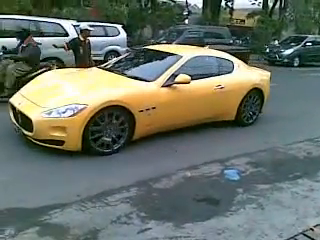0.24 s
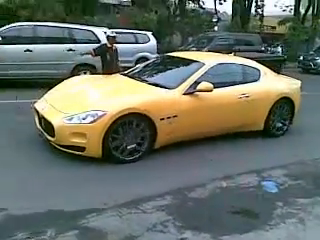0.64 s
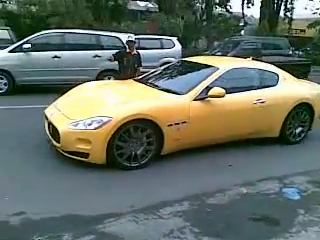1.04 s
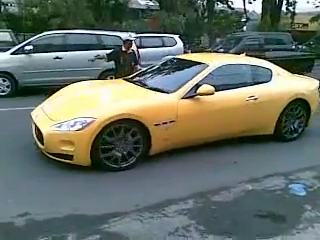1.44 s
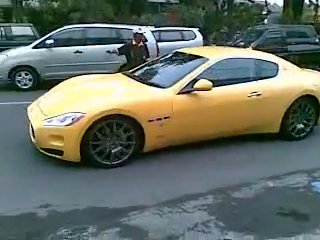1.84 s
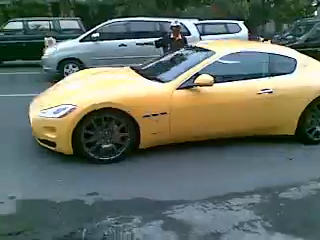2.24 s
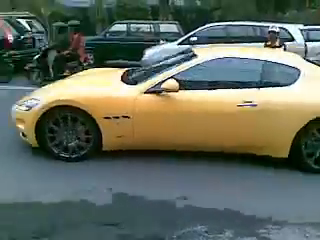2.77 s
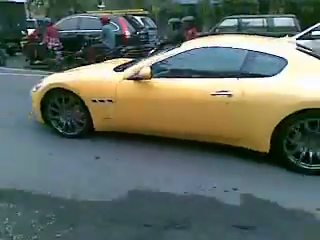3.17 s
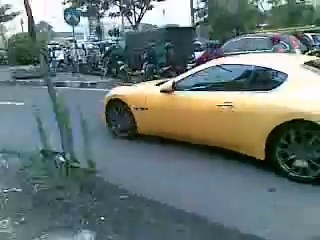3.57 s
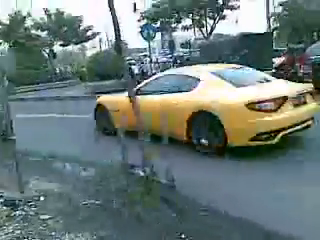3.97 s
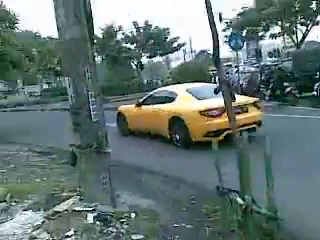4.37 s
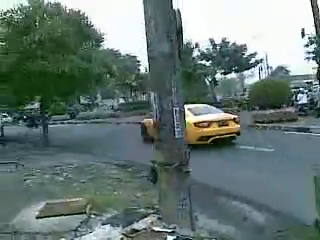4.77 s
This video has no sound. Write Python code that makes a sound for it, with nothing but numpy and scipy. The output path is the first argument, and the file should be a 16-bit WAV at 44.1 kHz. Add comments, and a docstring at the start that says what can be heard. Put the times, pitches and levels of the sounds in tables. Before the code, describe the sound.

A V8 sports car idles close to a roadside microphone with a deep, uneven burble. Distant city traffic washes softly throughout, with a few faint far-off toots and drones in the first second and a half and an occasional tick of grit. At about 1.4 seconds a two-tone car horn gives one very short beep, echoing lightly off the houses. Around 2 seconds the engine starts to rev up, with a quick run of exhaust pops near 2.5 seconds and a faint crunch of grit under the tyres. The exhaust booms and barks as the car passes at about 3 seconds, and the revs hold nearly level until 3.8 seconds. From 4 seconds the car accelerates away hard, the pitch climbing steadily as the exhaust cracks, rasps and hisses, still rising at about 5 seconds.

```python
"""A V8 sports car idles in a city street, then pulls past the microphone and accelerates away.
Its uneven firing pulses burble in the silencer, then bark, rasp and hiss as the tailpipes turn towards us.
While it idles, a two-tone horn gives one short beep and the house fronts answer.
A little grit ticks on the road; traffic washes in the distance. One microphone, at the roadside."""
import sys
import numpy as np
from scipy import signal
from scipy.fft import rfft, irfft, next_fast_len
from scipy.io import wavfile
from scipy.ndimage import uniform_filter1d

SR = 44100
rng = np.random.default_rng(int(sys.argv[2]) if len(sys.argv) > 2 else 0)


def generate_wav(sig):
    """Save sig (samples, or channels by samples) to the path in sys.argv[1] as 16-bit PCM at SR."""
    pcm = np.round(np.clip(np.atleast_2d(sig).T, -1, 1) * 32767).astype(np.int16)
    wavfile.write(sys.argv[1], SR, pcm)


N = 221861
T = np.arange(N) / SR


# engine speed as the car pulls away: (time [s], firing rate [Hz])
REVS = [(1.9, 59.2), (2.0, 67), (2.09, 77), (2.14, 78.5), (2.2, 94.84), (2.29, 102.8), (2.43, 113.0),
        (2.6, 124.42), (2.84, 164.6), (2.92, 169.75), (3.0, 173.41), (3.08, 181.24), (3.16, 186.29),
        (3.25, 195.61), (3.58, 195.21), (3.71, 198.61), (3.8, 196.76), (3.98, 207.81), (4.12, 222.31),
        (4.2, 232.37), (4.28, 246.67), (4.4, 256.55), (4.52, 272.99), (4.6, 288.53), (4.76, 314.26),
        (4.95, 345.69), (5.03, 358.72)]
def engine(idle_hz=57.08, idle_until_s=1.82, hunt_hz=0.588, lead_fires_s=4.1934, echo_db=-14):
    """The V8 going past: its speed times every pulse and sets the load; the sharper sounds echo."""
    rate_hz, = follow([(idle_until_s, idle_hz), *REVS])
    load = ramp(rate_hz, 66, 15)
    rate_hz = rate_hz + hunt_hz * (1 - load) * drift(3.08)
    turns = np.cumsum(rate_hz) / SR  # one turn per firing
    turns += (1 - np.interp(lead_fires_s, T, turns)) % len(CYLINDERS)  # the second cylinder is due then
    behind, = follow([(4.05, 0.19), (4.2, 0.67), (4.7, 0.91)])  # how far the pipes face the microphone
    pipes = tailpipes(turns, rate_hz, behind) + cracks(turns) + rattle(turns) + pops()
    notes = boom(turns, rate_hz) + load * silencer(turns, rate_hz) + snarl(turns, rate_hz)
    direct = notes + burble(turns, rate_hz, behind) + pipes
    return amp(echo_db) * street(pipes, t60=0.046) - direct


# the eight cylinders in firing order; each layer scales the strengths to its own depth:
# (silencer strength [dB], lateness [firing intervals], side strength [dB], rear strength [dB])
CYLINDERS = [(3.5, -0.0038, 3, -1), (3.5, 0.013, 5, 4), (3, 0.037, 1, 1), (-6, -0.031, -5, -2.5),
             (1.5, -0.031, 1.5, -1), (1.2, 0.0026, -3, 0), (1, 0.032, 0.5, 3.5), (-0.5, -0.012, -0.5, -0.5)]
LUMP_DB, LATE, SIDE_DB, REAR_DB = np.transpose(CYLINDERS)
def firings(turns, cylinders_db, scatter_db, jitter, depth=1):
    """One click per firing; each cylinder has its own strength and lateness, and no two burns match."""
    number = np.arange(int(turns[0]) + 1, int(turns[-1]))
    cylinder = number % len(CYLINDERS)
    burn, slip = rng.standard_normal((2000, 2))[number].T
    at = np.clip(np.interp(number + LATE[cylinder] + jitter * slip, turns, np.arange(N)), 0, N - 2)
    whole = at.astype(int)
    size = amp(np.broadcast_to(depth, N)[whole] * cylinders_db[cylinder] + scatter_db * burn)
    return np.bincount(whole, size * (1 - at + whole), N) + np.bincount(whole + 1, size * (at - whole), N)


def uneven_part(clicks, turns, share=1):
    """Takes a share of the even pulse train away, leaving the lope of the cylinders."""
    even = firings(turns, np.zeros(len(CYLINDERS)), scatter_db=1, jitter=0)
    return clicks - share * even * clicks.sum() / even.sum()


def puffs(clicks, decay_s):
    """A burst of turbulent gas after each click."""
    envelope = signal.lfilter([1], [1, -np.exp(-1 / (decay_s * SR))], clicks)
    return steady(envelope * rng.standard_normal(N))


# standing waves of the exhaust: (centre [Hz], width [Hz], gain [dB])
RESONANCES = [(55.5, 22, -26), (108.5, 14.4, -23), (180.4, 10, -29), (209.8, 39, -25), (247, 83, -25.5),
              (331.7, 30, -29), (570, 210, -38.5)]
# swell of the firing note at the microphone: (time [s], gain [dB])
BOOM_DB = [(2.4, -1), (2.75, 0.5), (3.0, 3.5), (3.16, 3), (3.22, -7.5), (3.33, -2), (3.45, 0), (3.7, -1),
           (3.9, 0.5), (4.2, 0.5), (4.35, -1.5), (4.9, 2.5)]
# the note an octave above it, as the exhaust passes it: (frequency [Hz], level [dB])
OCTAVE = [(114, -49), (150, -53), (175, -33.5), (195, -52), (215, -38.5), (236, -32), (262, -32),
          (285, -32.5), (315, -31), (335, -27), (365, -37.5), (385, -40), (405, -38), (440, -43),
          (500, -36), (605, -39), (645, -51), (690, -34)]
def boom(turns, rate_hz, full_flow_hz=164, flow_db_per_octave=10.5, waver_db=1.5):
    """The low notes of the mean gas flow swell and fade as they climb through the standing waves."""
    flow = amp(flow_db_per_octave * np.minimum(np.log2(rate_hz / full_flow_hz), 0))
    resonance = np.sqrt(sum((amp(db) / (1 + (2 * (rate_hz - centre) / width) ** 2)) ** 2
                            for centre, width, db in RESONANCES))
    swell_db, = follow(BOOM_DB)
    first = flow * resonance * amp(swell_db + waver_db * drift(6.3))
    second = amp(lookup(2 * rate_hz, OCTAVE) + waver_db * drift(9.9))
    return np.sqrt(2) * (first * np.cos(2 * np.pi * turns) + second * np.cos(4 * np.pi * turns))


# the silencer at idle, pulling, and heard from behind: (frequency [Hz], relative gain [dB])
IDLE = [(15, -68.5), (24, 19.5), (45, -7), (72, 14), (100, 3), (165, 2.5), (240, -16.5), (380, -30),
        (600, -62.5)]
PIPE = [(20, -10.5), (70, -1.5), (140, -10.5), (220, 7), (270, 6), (330, 8), (385, -1.5), (450, -31),
        (650, -71.5)]
PIPE_BEHIND = [(20, -26), (70, 2.5), (140, 8), (220, -19), (300, 9), (400, 11), (450, 6), (620, -66.5)]
def burble(turns, rate_hz, behind, idle_db=-42, load_db=-33.5, behind_db=-9):
    """Strong and weak firings depart from the mean flow and ring the silencer, deeper at idle."""
    pull = ramp(rate_hz, 70, 51.2)
    idling = uneven_part(firings(turns, LUMP_DB, scatter_db=5.5, jitter=.054), turns)
    pulling = uneven_part(firings(turns, .7 * LUMP_DB, scatter_db=1.1, jitter=.01), turns)
    leaving = uneven_part(firings(turns, .8 * LUMP_DB, scatter_db=.9, jitter=.005), turns)
    loaded = blend(colour(pulling, PIPE), colour(leaving, PIPE_BEHIND), behind)
    level_db = idle_db + (load_db - idle_db) * pull + behind_db * behind
    return amp(level_db) * blend(colour(idling, IDLE), loaded, np.sqrt(pull))


def silencer(turns, rate_hz, centre_hz=292, width_hz=48, ring_db=-37):
    """At low revs the third and fourth harmonics sing as they sweep through the silencer's resonance."""
    ring = sum(np.exp(-((k * rate_hz - centre_hz) / width_hz) ** 2) * np.cos(2 * np.pi * k * turns)
               for k in (3, 4))
    return np.sqrt(2) * amp(ring_db) * ring


# the driver's foot: (time [s], effort [dB])
PEDAL = [(2.2, -21.5), (2.52, -5.5), (2.78, -6), (2.87, 1), (3.0, -1.5), (3.6, 3), (3.72, -1), (4.05, 3.5),
         (4.6, 5), (4.7, 8.5)]
# how unequal the cylinders sound, most while the revs are held: (time [s], depth [ratio])
LOPE = [(2.4, .8), (2.8, .35), (3.0, .5), (3.25, 1.3), (3.65, 1.35), (3.8, .85), (4.05, 1)]
def tailpipes(turns, rate_hz, behind, db_per_octave=4.5):
    """The open pipes bark, rasp, hiss and ring under load; the blast grows with revs and pedal."""
    throttle, = follow([(2.05, 0.12), (2.25, 0.93)])
    pedal_db, = follow(PEDAL)
    unequal, = follow(LOPE)
    blast_db = -31 + db_per_octave * np.log2(rate_hz / 204.6) + pedal_db
    turns = turns + .022 * (1 - .55 * behind) * drift(24)  # eddies in the hot gas vary the travel time
    gentle = firings(turns, .7 * SIDE_DB, scatter_db=1.6, jitter=.01, depth=unequal)
    fronts = firings(turns, 1.1 * SIDE_DB, scatter_db=1.4, jitter=.012, depth=unequal)
    hard = firings(turns, REAR_DB, scatter_db=1.0, jitter=.01)
    lope = steady(uneven_part(hard, turns, share=.5))  # from behind, the banks' even beat partly cancels
    blast = amp(blast_db) * (bark(gentle, hard, lope, behind) + rasp(fronts, hard, lope, behind))
    gas = amp(.69 * blast_db) * hiss(turns, rate_hz, fronts, behind)
    return throttle * (blast + gas + pipe_mouth(turns, unequal))


# the bark from in front, abreast and behind: (frequency [Hz], relative gain [dB])
BARK_AHEAD = [(250, -54), (390, -22), (480, 7.5), (600, 11.5), (690, 9.5), (800, -10.5), (900, 4),
              (1020, 0), (1300, -52.5)]
BARK_SIDE = [(250, -60), (390, -26), (470, 8), (580, 3.5), (690, 3.5), (780, 11.5), (900, -1), (1020, 4.5),
             (1300, -65.5)]
BARK_BEHIND = [(250, -61.5), (390, 13.5), (470, 11), (600, 10.5), (700, -0.5), (820, 15.5), (950, -5.5),
               (1080, 1), (1350, -54.5)]
def bark(gentle, hard, lope, behind, abreast_s=3.09, gain_db=1, behind_db=-16):
    """Pulses ring the pipes' middle range, changing colour as the car draws level and leaves."""
    chuffs = steady(gentle) + .2 * puffs(gentle, .003)
    side = blend(colour(chuffs, BARK_AHEAD), colour(chuffs, BARK_SIDE), ramp(T, abreast_s, 0.079))
    rear = colour(lope + .15 * puffs(hard, .003), BARK_BEHIND)
    return amp(gain_db + behind_db * behind) * steady(reflected(blend(side, rear, behind)))


# the rasp from the side and from behind: (frequency [Hz], relative gain [dB])
RASP_SIDE = [(600, -17.5), (900, 1), (1100, 25), (1350, 20.5), (1520, 20.5), (1700, 12.5), (1950, 17),
             (2200, -40.5), (2600, -48), (4000, -69.5)]
RASP_BEHIND = [(600, -8.5), (900, 10), (1100, 1), (1280, 3), (1450, -2), (1700, 1), (2080, 7), (2400, -13),
               (2750, -11), (4500, -68.5)]
# its surge at the microphone: (time [s], gain [dB])
RASP_DB = [(2.35, -10), (2.7, -0.5), (2.85, -1.5), (2.95, 2), (3.15, 2), (3.45, -1), (3.7, 0), (3.9, .5),
           (4.05, -1), (4.6, -0.5), (5.0, -4.5)]
def rasp(fronts, hard, lope, behind, aim_s=4.055, aim_width_s=.055, gain_db=-6, behind_db=-4):
    """Pulses steepen into a rasp that peaks as the pipes sweep past the microphone."""
    surge_db, = follow(RASP_DB)
    aim_db = 5.5 * np.exp(-((T - aim_s) / aim_width_s) ** 2)
    side = colour(steady(fronts) + .2 * puffs(fronts, .002), RASP_SIDE)
    rear = colour(lope + .3 * puffs(hard, .002), RASP_BEHIND)
    level_db = gain_db + surge_db + behind_db * behind + aim_db
    return amp(level_db) * steady(reflected(blend(side, rear, behind)))


# the gas jet from the side, from behind and at top revs: (frequency [Hz], relative gain [dB])
HISS_SIDE = [(1500, -30.5), (2600, -2), (3200, -14), (4000, 2.5), (5000, -13), (6200, -8), (7500, -41),
             (9400, -10.5), (10300, -37), (13000, -42.5)]
HISS_BEHIND = [(1500, -11), (2600, -7), (3000, 5.5), (3450, 8), (4100, -2), (5000, -8), (6200, -16),
               (7500, -38), (9400, -32), (10300, -40), (13000, -43.5)]
HISS_TORN = [(1500, -12), (2600, 1), (3000, 2.5), (3400, 11), (4100, 1), (5000, -0.5), (6200, -9.5),
             (7500, -24), (9400, -6.5), (10300, -35), (13000, -23)]
def hiss(turns, rate_hz, fronts, behind, gain_db=-45, behind_db=12, tear_hz=293, tear_db=3.5):
    """Spat gas beams backwards; at top revs the jet tears, with one strong burst per crank turn."""
    spits = firings(turns, 2.2 * REAR_DB, scatter_db=1.5, jitter=.009)
    bursts = firings(turns, np.array([0, 13, 4, 0, 0, 8, 2, 0]), scatter_db=2.5, jitter=.02)
    side = colour(puffs(fronts, .0055) + .11 * rng.standard_normal(N), HISS_SIDE)
    rear = colour(puffs(spits, .0035) + .35 * rng.standard_normal(N), HISS_BEHIND)
    crackle = colour(puffs(bursts, .0018) + .25 * rng.standard_normal(N), HISS_TORN)
    torn = ramp(rate_hz, tear_hz, 7.5)
    level_db = gain_db + behind_db * behind + tear_db * torn
    return amp(level_db) * blend(blend(side, rear, behind), crackle, torn)


# the ring of the tailpipe's mouth: (frequency [Hz], relative gain [dB])
MOUTH = [(450, -51), (640, -12), (740, -2), (790, 6.5), (850, -5.5), (950, -18.5), (1300, -59), (3000, -91)]
# its swell on the way past: (time [s], relative level [dB])
MOUTH_DB = [(2.3, -66), (2.52, -47.5), (2.7, -44.5), (2.85, -52), (3.1, -47), (3.22, -41), (3.35, -35.5),
            (3.48, -47), (3.57, -32.5), (3.65, -36), (3.72, -52), (3.85, -71)]
def pipe_mouth(turns, unequal):
    """The pulses ring the tailpipe's mouth with a flutter, loudest as it passes closest."""
    level_db, = follow(MOUTH_DB)
    knocks = firings(turns + .014 * drift(45), SIDE_DB, scatter_db=2.0, jitter=.02, depth=unequal)
    return amp(level_db) * steady(colour(knocks, MOUTH))


# partials of the two banks, before the pipes shape them:
# (multiple of crank speed [ratio], level turning away [dB], level from straight behind [dB])
SNARL = [(1, -42, -37), (1.5, -52.5, -40), (2.5, -44, -47), (3, -52, -36.5), (3.5, -48.5, -40.5),
         (4.5, -45, -33.5), (5, -39, -31), (5.5, -43, -49), (6, -43, -31.5), (6.5, -46.5, -52),
         (7, -37, -33), (7.5, -49, -57), (8.5, -52, -50), (9, -47.5, -47.5), (9.5, -59, -51),
         (10, -51.5, -37.5), (10.5, -57, -45), (11, -44, -44), (11.5, -50.5, -56), (12, -39.5, -40),
         (12.5, -60.5, -46), (13, -50, -42), (14, -54.5, -47), (17, -47.5, -54), (19, -49.5, -51.5),
         (21, -45, -53), (22, -47.5, -46)]
# peaks and gaps of the tailpipes: (frequency [Hz], gain [dB])
SNARL_PIPE = [(300, -6.5), (400, -6.5), (455, -6.5), (520, -3), (600, 2.5), (645, 7), (690, 6.5),
              (740, 3.5), (775, -1), (810, 2.5), (850, 1.5), (900, -4.5), (950, -9.5), (1020, -0.5),
              (1200, 0)]
def snarl(turns, rate_hz, from_s=3.89, away_s=4.41, waver_db=2.5, dispersion=.9):
    """From behind, the banks beat unevenly: close-set crank partials climb through the pipes' peaks."""
    crank, crank_hz = turns / 4, rate_hz / 4
    away = ramp(T, away_s, 0.26)
    partials = np.zeros(N)
    for k, turning_db, away_db in SNARL:
        db = turning_db + (away_db - turning_db) * away + lookup(k * crank_hz, SNARL_PIPE)
        swell_db, wobble = waver_db * drift(9), .22 * drift(45)
        partials += amp(db + swell_db) * np.cos(2 * np.pi * k * crank + dispersion * k * k + wobble)
    return np.sqrt(2) * ramp(T, from_s, 0.25) * partials


# the crack of the strongest pulses: (frequency [Hz], relative gain [dB])
CRACK = [(600, -24), (1000, 6), (1500, 11.5), (2050, 10), (2700, -12.5), (3500, -15.5), (5000, -14.5),
         (6200, -30), (9500, -43), (13000, -55.5)]
def cracks(turns):
    """The strongest pulses steepen into shocks that crack out once the pipes face the microphone."""
    level_db, = follow([(4.08, -85), (4.16, -35.5), (4.32, -35), (4.42, -44),
                        (4.6, -44), (4.75, -54), (5.03, -60)])
    shocks = firings(turns, 2.2 * REAR_DB, scatter_db=1.0, jitter=.008)
    return amp(level_db) * steady(reflected(colour(shocks, CRACK)))


# pops as the throttle bites: (time [s], relative level [dB])
POPS = [(2.4344, -19.5), (2.4822, -15.5), (2.5157, -14.5), (2.548, -11), (2.581, -17), (2.6113, -16)]
# their colour: (frequency [Hz], relative gain [dB])
POP_COLOUR = [(300, -30), (700, 12), (1100, 0), (1700, 4), (2050, -6), (2400, -25), (4000, -23),
              (9000, -39), (13000, -50)]
def pops():
    """Single hard burns snap out of the pipes."""
    clicks = np.zeros(N)
    for s, db in POPS:
        clicks[round(s * SR)] = amp(db)
    return reflected(colour(clicks, POP_COLOUR))


def rattle(turns, ring_s=0.0016):
    """At held revs a thin piece of metal buzzes once in each engine cycle."""
    level_db, = follow([(3.3, -69), (3.55, -60.5), (3.8, -75)])
    knocks = firings(turns, 4 * SIDE_DB, scatter_db=2.5, jitter=.02)
    held = ramp(T, 2.9, .3) - ramp(T, 3.85, .3)
    metal = [(2500, -35.5), (3500, -4), (4050, 9), (4500, -16), (6000, -36)]
    return held * amp(level_db) * colour(puffs(knocks, ring_s), metal)


# the horn pair: (harmonic [number], low horn level [dB], high horn level [dB])
HORN = [(1, -40, -50), (2, -36.5, -33.5), (3, -37.5, -45), (4, -33.5, -27), (5, -33, -49.5), (6, -46, -62),
        (7, -44, -71), (8, -62, -60), (9, -63, -75), (10, -61, -67), (11, -70, -65), (13, -63, -70),
        (14, -66, -75), (15, -63, -70), (17, -73, -66)]
# how strongly the street rings on after it: (frequency [Hz], gain [dB])
HORN_RING = [(420, -14), (830, -19), (1020, -3.5), (1250, -4), (1670, -17), (2050, -24), (2500, -6),
             (3000, -24), (4200, -33)]
def horn(start_s=1.363, length_s=0.057, rise_s=0.01, release_s=0.017, ring_s=0.063,
         low_hz=416.5, high_hz=511, sag_per_s=0.45, dispersion=0.36):
    """Two buzzing diaphragms a third apart; near partials beat, and the middle ones ring on."""
    t = np.maximum(T - start_s, 0)
    after = np.maximum(t - length_s, 0)
    direct, ring = np.exp(-after / release_s), np.exp(-after / ring_s)
    slack = t - sag_per_s * np.minimum(after, 2 * release_s) ** 2 / 2  # pitch droops as the current stops
    low, high = (hz * slack + .006 * drift(150) for hz in (low_hz, high_hz))
    tone = np.zeros(N)
    for k, low_db, high_db in HORN:
        for cycles, hz, db in ((low, low_hz, low_db), (high, high_hz, high_db)):
            fade = np.maximum(direct, ring * amp(lookup(k * hz, HORN_RING)))
            tone += amp(db) * fade * np.cos(2 * np.pi * k * cycles + dispersion * k ** 2)
    chatter = 1 + 0.11 * drift(320)  # the contact breaker strikes unevenly
    return np.sqrt(2) * np.minimum(t / rise_s, 1) * chatter * tone


# grit on the road: (time [s], relative peak [dB], rise [s], decay [s])
GRIT = [(0.361, -54.5, 0.0014, 0.0054), (1.126, -55, .001, .004), (2.385, -57.5, 0.014, 0.016),
        (2.528, -64.5, 0.023, 0.027), (2.65, -57, 0.022, 0.03), (2.766, -56, 0.028, 0.074),
        (2.913, -56.5, 0.023, 0.27), (4.133, -51.5, .001, 0.013)]
def grit(gain=0.94):
    """Small stones snap and crunch under the tyres."""
    snaps = sum(amp(db) * np.exp(-(np.minimum(T - s, 0) / rise_s) ** 2 - np.maximum(T - s, 0) / decay_s)
                for s, db, rise_s, decay_s in GRIT)
    stone = [(1500, -21.5), (3000, -6), (4200, 3.5), (6000, -7),
             (9500, -6.5), (10500, -22.5), (13000, -27.5)]
    return gain * colour(snaps * rng.standard_normal(N), stone)


def reflected(x, ground_s=0.00122, ground=0.19, far_pipe_s=.0069, far_pipe=0.24):
    """Each pulse reaches the microphone again off the road and from the far side of the car."""
    return x + ground * np.interp(T - ground_s, T, x) + far_pipe * np.interp(T - far_pipe_s, T, x)


def street(x, t60, first_s=0.02, echoes_per_s=2000):
    """Scattered echoes from parked cars and house fronts."""
    t = np.arange(SR) / SR
    taps = rng.choice([-1, 1], SR) * (rng.random(SR) < echoes_per_s / SR)
    taps = taps * (t > first_s) * amp(-60 * t / t60)
    return signal.oaconvolve(x, taps / np.linalg.norm(taps))[:N]


# distant traffic: (frequency [Hz], relative gain [dB])
TRAFFIC = [(30, 1.5), (200, 8.5), (400, -1), (500, -8), (650, -6.5), (850, -6.5), (1300, -8), (1900, -4.5),
           (2300, -12), (2800, -19), (4000, -20), (5500, -24), (7500, -31.5), (9300, -30), (10500, -38.5),
           (13000, -56)]
# its level at the roadside: (time [s], level [dB])
TRAFFIC_DB = [(0, -47), (1.0, -43.5), (2.0, -46.5), (2.5, -43.5), (5.03, -44.5)]
def traffic(swell_db=1.1):
    """The wash of far tyres and engines."""
    level_db, = follow(TRAFFIC_DB)
    wash = colour(rng.standard_normal(N), TRAFFIC)
    return amp(level_db + swell_db * drift(16)) * wash / wash.std()


# tones of other traffic: (start [s], end [s], first pitch [Hz], last pitch [Hz], level [dB])
FAR_TONES = [(0, 0.22, 592, 606, -55), (0.744, 0.826, 464, 505, -52), (0.848, 1.567, 328, 365.7, -54.5)]
def far_tones(waver_db=1.2):
    """Faint toots and drones from farther down the street."""
    tones = np.zeros(N)
    for start, end, from_hz, to_hz, db in FAR_TONES:
        arch = np.sqrt(2 * abs(np.sin(np.pi * ramp(T, start, end - start))))
        cycles = np.cumsum(np.interp(T, [start, end], [from_hz, to_hz])) / SR
        tones += amp(db + waver_db * drift(8)) * arch * np.sin(2 * np.pi * cycles)
    return tones


def amp(db):
    """Decibels to amplitude."""
    return 10 ** (np.asarray(db) / 20)


def ramp(x, start, span):
    """Rises from zero at start to one at start + span."""
    return np.clip((x - start) / span, 0, 1)


def lookup(x, table):
    """A two-column curve, read at x."""
    return np.interp(x, *np.transpose(table))


def follow(table):
    """Every column of a time curve, sample by sample."""
    s, *columns = np.transpose(table)
    return [np.interp(T, s, c) for c in columns]


def steady(x, size=3500):
    """Scales a sound to a running rms of one."""
    return x / np.sqrt(abs(uniform_filter1d(uniform_filter1d(x * x, size), size)) + 1e-14)


def blend(a, b, share):
    """Passes from one sound to another at a steady level."""
    return steady((1 - share) * steady(a) + share * steady(b))


def colour(x, points):
    """A causal filter from (frequency [Hz], relative gain [dB]): it rings only after each pulse."""
    hz, db = np.transpose(points)
    grid = np.abs(np.fft.fftfreq(8192, 1 / SR))
    log_gain = np.log(amp(np.interp(np.log(grid + 1), np.log(hz + 1), db)))
    ring = np.fft.ifft(np.exp(np.conj(signal.hilbert(log_gain)))).real[:4096]
    return signal.oaconvolve(x, ring / np.linalg.norm(ring))[:N]


def drift(hz):
    """A random wander of unit size, rolling off above hz."""
    size = next_fast_len(N)
    rolloff = np.exp(-(np.fft.rfftfreq(size, 1 / SR) / hz) ** 2)
    slow = irfft(rfft(rng.standard_normal(size)) * rolloff, size)[:N]
    return slow / slow.std()


def scene():
    """The street in mono: the car close by, the horn and its echo, traffic far off."""
    beep = horn()
    houses = [(300, 1), (800, -5.5), (1200, 0), (1600, -3), (2100, -13.5), (3000, -9), (9000, -39)]
    beep_echo = amp(-27.5) * colour(street(beep, t60=.6, first_s=.08), houses)
    return (engine() + beep + beep_echo + grit() + traffic() + far_tones())[None]


def record(dry):
    """The microphone channel passes nothing above its band limit."""
    lowpass = signal.firwin(255, cutoff=13800, window=("kaiser", 9), fs=SR)
    return signal.oaconvolve(dry, lowpass[None], "same")


dry = scene()
out = record(dry)
generate_wav(out)
```